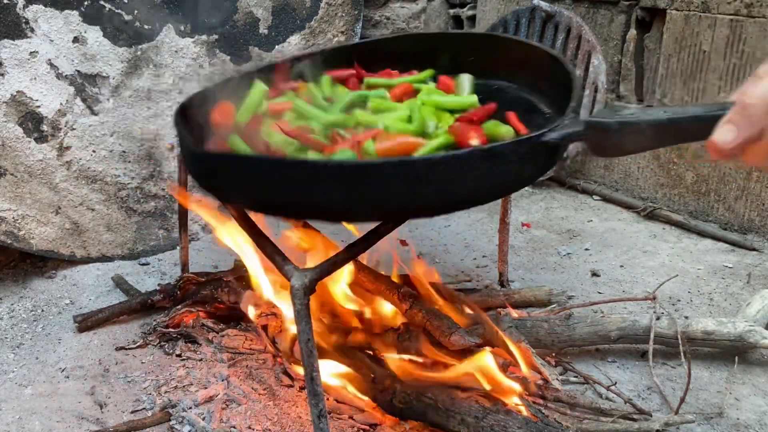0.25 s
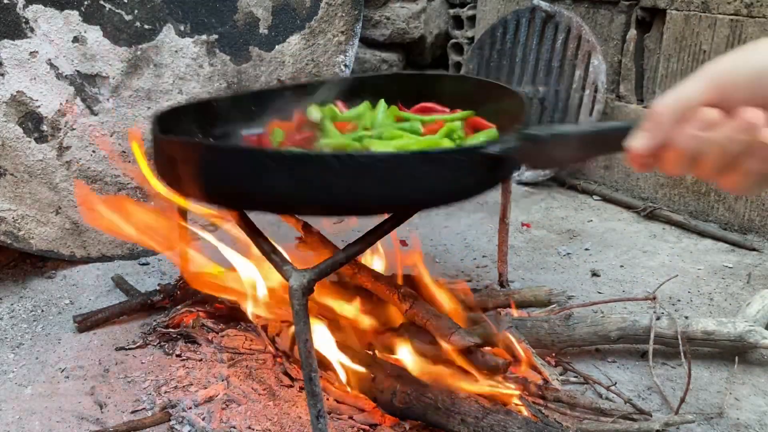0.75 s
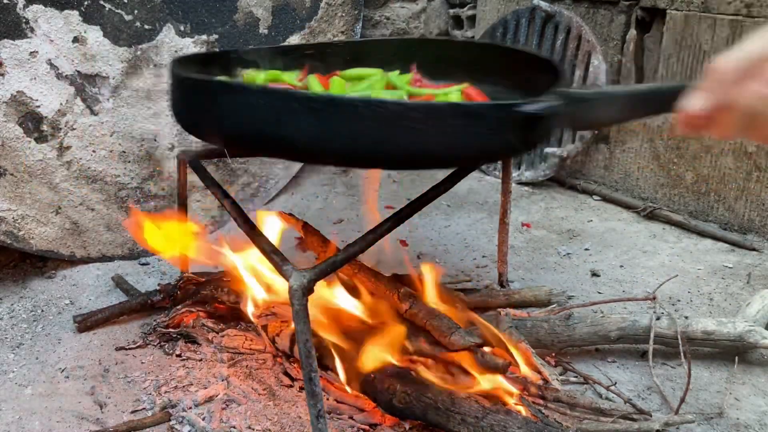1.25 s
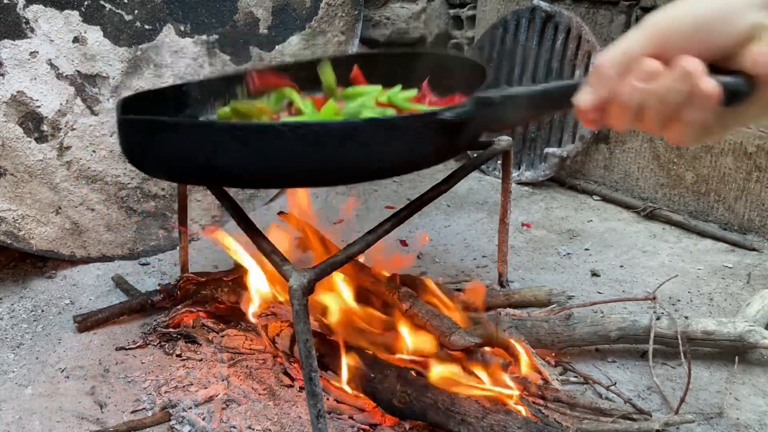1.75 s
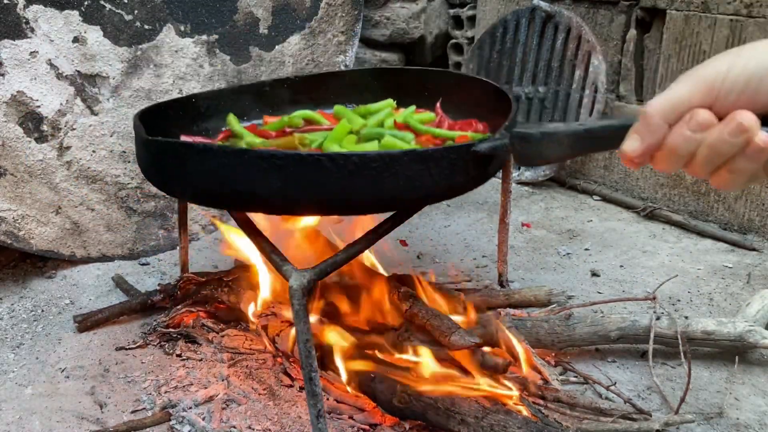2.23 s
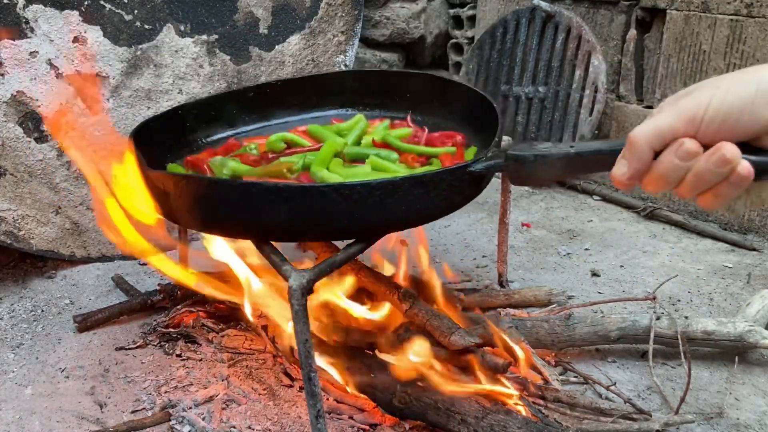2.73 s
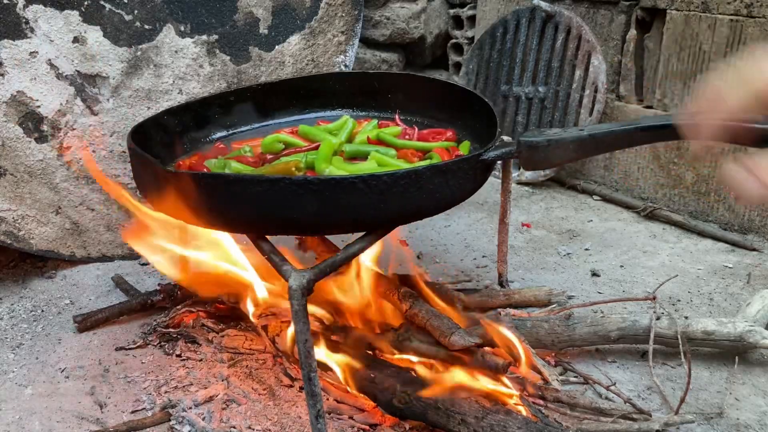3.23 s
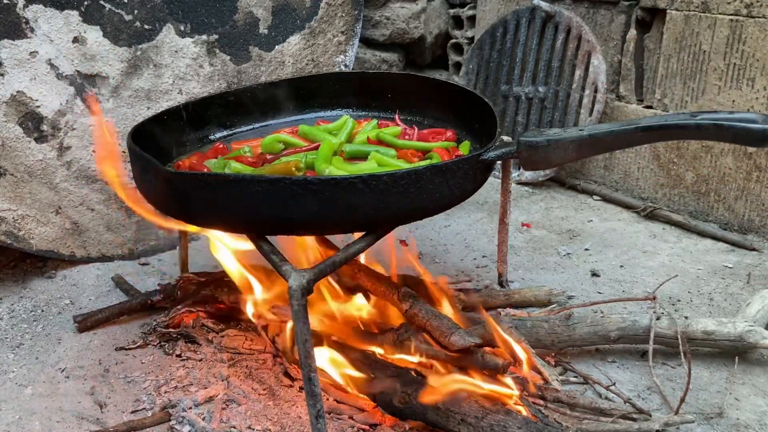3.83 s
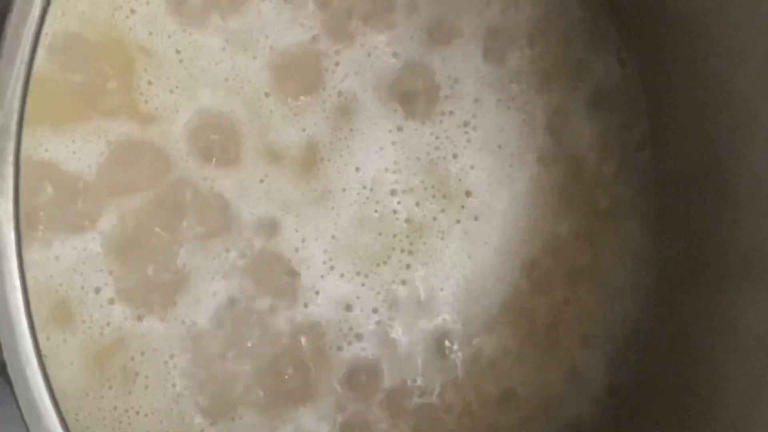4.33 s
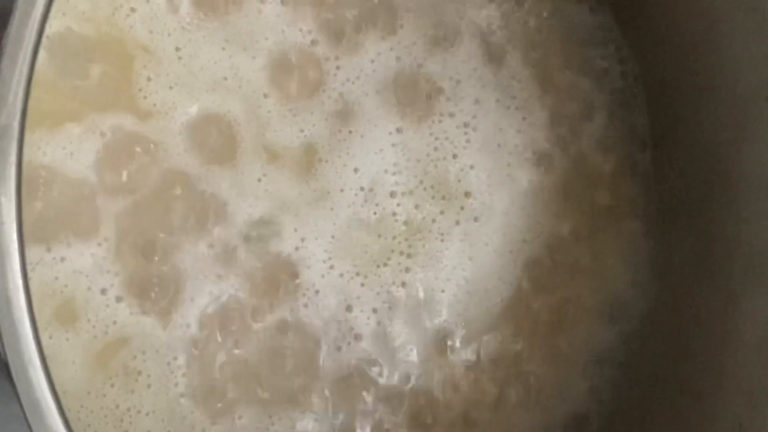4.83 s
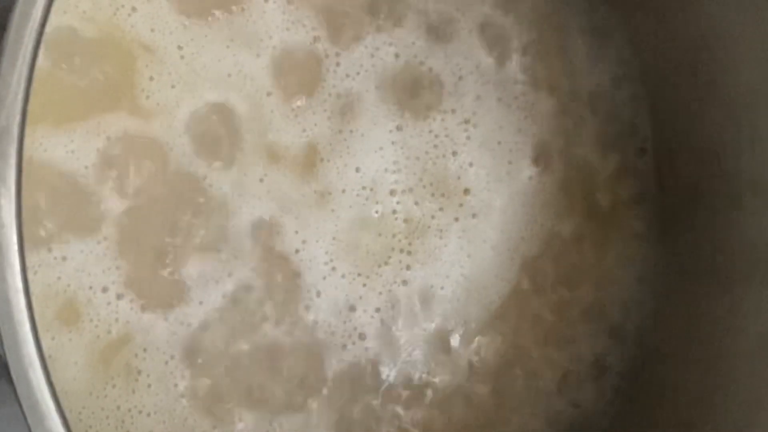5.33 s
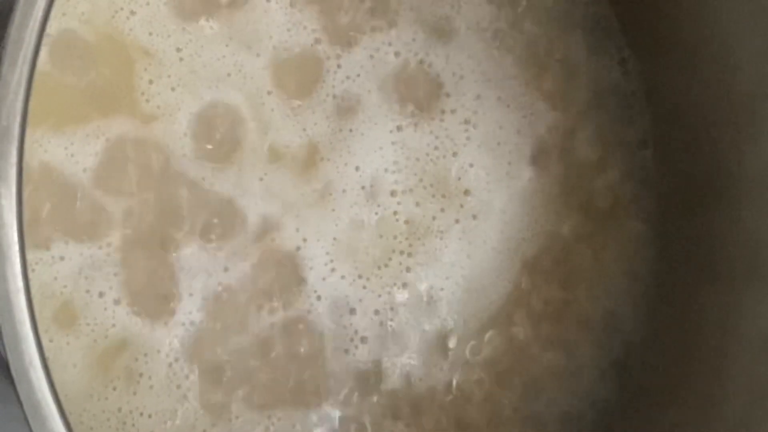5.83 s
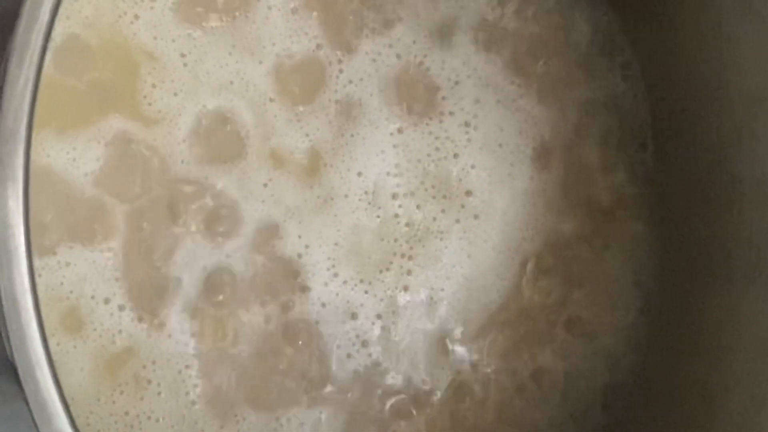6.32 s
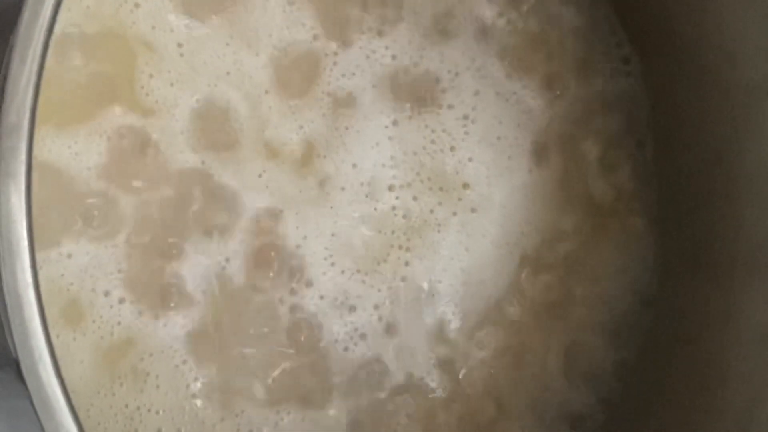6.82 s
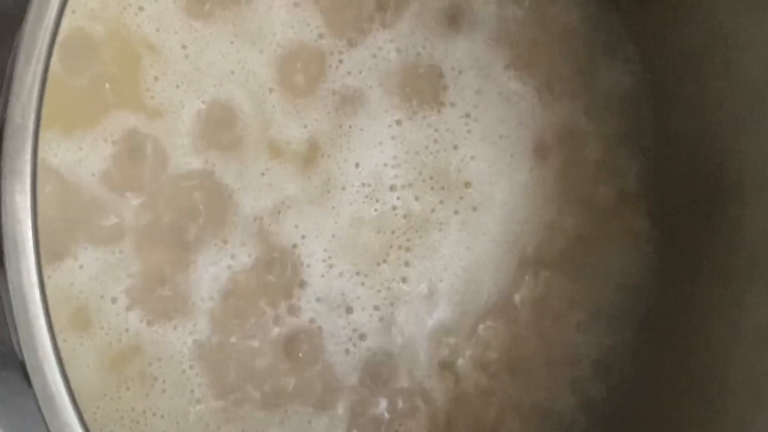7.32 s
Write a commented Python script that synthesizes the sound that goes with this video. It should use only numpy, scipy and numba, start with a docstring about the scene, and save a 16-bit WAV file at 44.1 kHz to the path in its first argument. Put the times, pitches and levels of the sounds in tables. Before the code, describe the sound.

From 0 to about 4.07 seconds, in a yard, peppers fry in hot oil: a loud, bright, continuous sizzle, slightly softer at the very start, swelling by 0.3 seconds and easing after 3. Countless tiny steam blips and sharp, irregular fat spits crackle through it. Underneath, a wood fire flutters low and soft. The steel pan knocks an iron trivet at about 0.65 seconds, short and dull with a low thud, then clunks and rattles from 2.6 to 3.0, with weaker taps around 3.6. A hard cut at 4.07 drops to a much quieter kitchen. Until about 7.6 seconds, thick foamy broth seethes close by: small rising blips, rounded wet pops and low plops in uneven clusters, stronger near 4.45 and 7.35, with faint droplet ticks, slight pot-wall resonance, low stove hum and faint hiss. Close phone stereo, wide in the yard and narrower over the pot.

```python
"""A yard, then indoors after a hard cut: a steel pan over a wood fire, and close over a pot of thick foamy broth.
Yard: peppers sizzle in hot oil (flickering noise), steam bubbles blip (short sines), fat spits (sines and noise
bursts), the pan knocks on an iron trivet (ringing modes, late thuds) and flames flutter low (noise).
Kitchen: broth bubbles seethe and pop (rising sines, noise bursts), droplets tick, stove and room murmur (noise).
A phone with two microphone ports hears both: alike in the bass, the right port later in the treble."""
import sys
import numpy as np
from scipy import signal
from scipy.fft import rfft, irfft, next_fast_len
from scipy.io import wavfile
from scipy.ndimage import uniform_filter1d
from numba import njit

SR = 44100
rng = np.random.default_rng(int(sys.argv[2]) if len(sys.argv) > 2 else 0)


def bounce(signal):
    """Save signal as a 16-bit WAV file at the path given by the first command-line argument."""
    frames = np.transpose(np.atleast_2d(signal))
    limited = np.clip(frames, -1, 1)
    pcm = np.round(limited * 32767).astype(np.int16)
    wavfile.write(sys.argv[1], SR, pcm)


N = 333837
T = np.arange(N) / SR
SIZE = next_fast_len(N + 4096)  # FFT length, with room for filter tails
HZ = np.maximum(np.fft.rfftfreq(SIZE, 1 / SR), 1.)
CUT_S, CUT_FADE_S = 4.068, 0.0078  # from yard to kitchen


def undb(db):
    """Decibels to gain."""
    return 10 ** (np.asarray(db) / 20)


def unit(x):
    """Scaled to rms 1."""
    return x / np.sqrt(np.mean(x ** 2))


def curve(table):
    """A (time_s, value) table at every sample."""
    return np.interp(T, *np.transpose(table))


def along(points):
    """(pitch_hz, value) points at every frequency bin, straight lines over log frequency."""
    points = np.array(points)
    return np.interp(np.log(HZ), np.log(points[:, 0]), points[:, 1])


def shaped(x, gain):
    """Filter by a gain for every frequency bin."""
    return irfft(rfft(x, SIZE) * gain, SIZE)[..., :N]


def walk(rate):
    """Random levels held 1 / rate s and smoothed twice; rms 1."""
    hold = int(SR / rate)
    steps = np.repeat(rng.standard_normal(N // hold + 1), hold)
    smooth = uniform_filter1d(uniform_filter1d(steps, hold), hold)
    return unit(smooth[:N])


def bands(excite, colour, flicker_db, rate):
    """Overlapping octave bands of a coloured sound, each flickering on its own; rms 1."""
    out = 0
    spectrum = rfft(excite, SIZE) * undb(along(colour))
    for centre_hz in 2. ** np.arange(5, 15):
        octaves_away = np.clip(np.log2(HZ / centre_hz), -1, 1)
        share = np.cos(np.pi / 2 * octaves_away) ** 2
        band = irfft(spectrum * share, SIZE)[:N]
        out = out + band * undb(flicker_db * walk(rate))
    return unit(out)


@njit
def grains(n, start, hz, cycles, size, glide, rise):
    """Short sines that swell, glide in pitch and die; start marks the crest, cycles sets the decay."""
    y = np.zeros(n)
    soft = rise ** 2 / 2  # rounds the crest
    for k in range(len(start)):
        tau = cycles[k] * SR / hz[k]  # decay in samples
        phase = 0.
        for i in range(int(-3 * rise * tau), int(6 * tau)):
            j = int(start[k]) + i
            phase += 2 * np.pi * hz[k] / SR * (1 + glide * i / tau)
            if 0 <= j < n:
                if i < 0:
                    envelope = np.exp(-(i / (rise * tau)) ** 2)
                else:
                    envelope = np.exp(soft - np.sqrt(soft ** 2 + (i / tau) ** 2))
                y[j] += size[k] * np.sin(phase) * envelope
    return y


def bursts(s, db, t60_s, low_hz, high_hz, order=4, rise_s=0.00018):
    """Noise between two soft band edges that swells up to each moment and dies away."""
    starts = np.zeros(N)
    np.add.at(starts, (s * SR).astype(int), undb(db))
    t = np.arange(-1024, 2048) / SR
    swell = np.exp(np.minimum(t, 0) / rise_s)
    decay = undb(-60 * np.maximum(t, 0) / t60_s)
    envelope = signal.oaconvolve(starts, np.where(t < 0, swell, decay))[1024:N + 1024]
    edges = 1 / np.sqrt((1 + (low_hz / HZ) ** 4) * (1 + (HZ / high_hz) ** order))
    return shaped(envelope * rng.standard_normal(N), edges / np.sqrt(np.mean(edges ** 2)))


def crackle(rate, scatter_db, t60_s):
    """Tiny noise bursts at random moments, rate per second, most small and a few large."""
    chance = rng.random((N, 2)).T
    struck = chance[0] < rate / SR
    sizes = struck * undb(-scatter_db * np.log(chance[1] + .002))
    fade = undb(-60 * np.arange(256) / SR / t60_s)
    return unit(signal.fftconvolve(sizes, fade)[:N] * rng.standard_normal(N))


def echoes(x, t60_s):
    """A dense short tail of reflections, its impulse response scaled to energy 1."""
    t = np.arange(2048) / SR
    tail = rng.standard_normal(len(t)) * undb(-60 * t / t60_s)
    return signal.fftconvolve(x, tail / np.sqrt(np.sum(tail ** 2)))[:N]


def scatter(x, gain=0.5):
    """Four short all-pass echoes scramble the phases and keep the colour."""
    delays = rng.integers(8, 45, (4, 1))  # samples
    late = np.exp(-2j * np.pi * HZ * delays / SR)
    return shaped(x, np.prod((late - gain) / (1 - gain * late), axis=0))


# Colour of stove and room noise: pitch_hz, level_db (per Hz)
KITCHEN_COLOUR = [(25, -36), (45, 0), (70, 2), (125, 1.5), (165, -8.5), (235, 0), (300, -13.5), (400, -4.5),
                  (520, -20), (700, -7), (1000, -13), (2000, -20), (3500, -27.5), (5500, -34),
                  (9000, -35.5), (14000, -38), (15700, -47)]


def kitchen():
    """Low hum of the stove and faint hiss of the room, both as flickering noise."""
    return bands(rng.standard_normal(N), KITCHEN_COLOUR, flicker_db=2.7, rate=16.) * undb(-60.5)


# Loudness of the fire: start_s, level_db
FLAME_LEVEL = [(0.0, -48), (3.87, -47.5), (4.06, -54.5)]
# Colour of the fire: pitch_hz, level_db (per Hz)
FLAME_TONE = [(25, -26), (40, 2.5), (60, -3.5), (110, -1.5), (200, -8.5), (350, -15), (600, -27.5)]


def flames():
    """The wood fire flutters low: noise in bands whose levels wander."""
    flutter = bands(rng.standard_normal(N), FLAME_TONE, flicker_db=2.5, rate=11.0)
    return flutter * undb(curve(FLAME_LEVEL))


# Pan against trivet: start_s, level_db, thud_pitch_hz (at the crest), ring_db (against the thud),
# tilt_db (per octave away from 400 Hz, on the ringing modes)
PAN_KNOCKS = [(0.652, -20, 114.5, -3.5, 0.5), (0.681, -30, 99, -1, 0), (0.696, -31.5, 119, -9, 0),
              (2.611, -19, 114, -2, 4), (2.668, -22, 134, -11, -15.5), (2.727, -27, 108, -20.5, -4),
              (2.77, -27, 117, 3, -8), (2.865, -28, 119.3, -6.5, -10), (2.887, -31.5, 125, -1.5, -13),
              (2.964, -34.5, 150, -3, 3), (2.98, -37, 120, -16, 0), (3.583, -34, 201, -5, -9),
              (3.597, -30, 136.6, -18, -3), (3.62, -31, 164.4, -15.5, -5), (3.639, -34, 169.4, -17.5, 0),
              (3.662, -38.5, 130, -14.5, 0)]
# Ringing modes of the steel pan: pitch_hz, level_db, t60_s
PAN_RINGS = [(215, -10, .05), (406, -3, .05), (540.4, 3, 0.0555), (699, -3.5, 0.039)]
THUD_T60_S, THUD_LATE_S = 0.083, .0135


def knocks():
    """The pan rings and rattles; trivet and ground answer with a later thud that sags in pitch and rumbles on."""
    s, db, thud_hz, ring_db, tilt_db = np.transpose(PAN_KNOCKS)
    fall = np.log(1000)  # decay constants in one t60
    thud_s = s + THUD_LATE_S
    out = grains(N, thud_s * SR, thud_hz, THUD_T60_S * thud_hz / fall, undb(db), -0.08, 0.55)
    rumble = bursts(thud_s, db - 16.5, t60_s=.3, low_hz=90., high_hz=280., rise_s=.004)
    rattle = bursts(s, db + ring_db - 12.5, t60_s=0.11, low_hz=170., high_hz=900.0)
    out += rumble + rattle
    for mode_hz, mode_db, t60_s in PAN_RINGS:
        chance = rng.standard_normal((len(s), 2)).T
        # every knock detunes and weights the modes a little differently
        ring_hz = mode_hz * (1 + 0.03 * chance[0])
        level_db = db + ring_db + mode_db + tilt_db * abs(np.log2(mode_hz / 400)) + 1.2 * chance[1]
        out += grains(N, (s + 0.0023) * SR, ring_hz, t60_s * ring_hz / fall, undb(level_db), 0., 0.205)
    return out


# Clearer droplets ticking in the treble: start_s, level_db
DROPLETS = [(4.3049, -59), (4.7679, -57), (5.0058, -61.5), (5.0427, -62), (5.5167, -63), (5.597, -63),
            (6.0639, -60), (6.3792, -62), (6.474, -63), (6.8068, -62.5), (6.9918, -63), (7.1659, -54),
            (7.2582, -61)]


def splashes(count=5):
    """Each droplet ticks in a puff of hiss; count faint ones fall at random."""
    chance = rng.random((count, 2)).T
    faint = [CUT_S + (T[-1] - CUT_S) * chance[0], -62.5 + 6. * (chance[1] - .5)]
    s, db = np.hstack([np.transpose(DROPLETS), faint])
    tick = bursts(s, db, t60_s=0.0047, low_hz=7000., high_hz=15000.)
    puff = bursts(s, db - 15.0, t60_s=.12, low_hz=6000., high_hz=15120.0)
    return tick + puff


# Small bubbles in flurries and lulls: start_s, level_db (before the random sway)
SEETHE_LEVEL = [(4.08, -61), (4.45, -63.5), (4.55, -72), (4.7, -54), (4.9, -64.5), (5.0, -61),
                (5.12, -61.5), (5.4, -59.5), (6.0, -65), (6.08, -58), (6.3, -62), (6.58, -64.5),
                (6.8, -59.5), (7.15, -60.5), (7.27, -62), (7.4, -62.5), (7.57, -64)]


def seethe(count=600):
    """Many small bubbles as short rising sines, scattered in time, pitch and size."""
    chance = rng.random((count, 4)).T
    s = CUT_S + (T[-1] - CUT_S) * chance[0]
    hz = 450 * 2 ** (1.87 * chance[1])
    cycles = 0.594 + 0.923 * chance[3]
    # a few large among many small, weaker away from 800 Hz
    size = undb(-2.6 * np.log(chance[2] + 0.035) - 2.8 * abs(np.log2(hz / 800)))
    small = grains(N, s * SR, hz, cycles, size, 0.042, 0.88)
    return small / np.std(small[T > CUT_S]) * undb(curve(SEETHE_LEVEL) + 3.5 * walk(22.0))


# Broth bubbles bursting: start_s, level_db, pitch_hz (at the crest),
# spray_db (reference level that each part of the spray is set from)
BUBBLE_POPS = [(4.1514, -36, 1750, -54), (4.2162, -45.5, 1287, -61), (4.302, -45, 1390, -67),
               (4.3215, -46, 980, -68), (4.3502, -36, 920, -61), (4.3686, -40, 920, -67),
               (4.3776, -49, 980, -65), (4.4013, -36.5, 1650, -58), (4.4499, -32.5, 1105, -53),
               (4.461, -44, 1310, -71), (4.6021, -48, 780, -75), (4.6375, -39.5, 1040, -66),
               (4.653, -38.5, 1460, -65), (4.6647, -48, 1040, -73), (4.6936, -43, 1850, -48),
               (4.7113, -44, 1390, -63), (4.7178, -41, 1169, -66), (4.728, -37.5, 1850, -60),
               (4.742, -47, 730, -68), (4.753, -44, 2620, -54), (4.8203, -43, 1470, -62),
               (4.8408, -42, 980, -48), (4.86, -45, 870, -71), (4.9553, -40.5, 1170, -59),
               (4.9635, -41, 1470, -59), (4.98, -37.5, 1530, -55), (5.0416, -37, 1230, -72),
               (5.077, -46, 870, -78), (5.0985, -53, 818, -80), (5.1641, -36, 1850, -44),
               (5.1733, -47, 1850, -57), (5.2584, -40, 1560, -59), (5.2658, -41.5, 866, -74),
               (5.2928, -45, 981, -72), (5.303, -39, 3340, -37.5), (5.3082, -46, 2200, -57),
               (5.3195, -47, 780, -59), (5.3294, -45, 920, -66), (5.348, -40, 1560, -58),
               (5.3802, -37.5, 990, -56), (5.3893, -36, 1550, -57), (5.4622, -45, 1040, -73),
               (5.4694, -48, 980, -67), (5.4961, -38.5, 1560, -53), (5.519, -49, 1390, -65),
               (5.531, -34.5, 1373, -62), (5.5415, -36, 1730, -59), (5.5612, -50, 1850, -71),
               (5.5953, -43, 1470, -69), (5.6046, -39, 1960, -54), (5.6178, -50, 3110, -47),
               (5.6629, -43, 1470, -69), (5.6867, -45, 1171, -69), (5.6941, -48, 1470, -57),
               (5.7123, -45, 730, -64), (5.7203, -47, 870, -73), (5.7896, -39, 980, -66),
               (5.8527, -43, 1040, -65), (5.8602, -36.5, 1216, -60), (5.8695, -46, 1036, -68),
               (5.9006, -49, 1470, -62), (5.9159, -44, 1229, -64), (5.9487, -34.5, 1960, -48),
               (5.963, -41, 1390, -65), (5.9805, -44, 780, -69), (6.0109, -52, 2940, -56),
               (6.0154, -42, 1300, -62), (6.055, -50, 980, -73), (6.1378, -50, 1560, -71),
               (6.167, -45, 820, -62), (6.171, -40, 2200, -59), (6.1877, -46, 1390, -69),
               (6.1963, -46, 820, -73), (6.2284, -46, 870, -75), (6.2416, -36.5, 780, -68),
               (6.2573, -36.5, 1530, -58), (6.3214, -41, 1850, -63), (6.33, -40, 1040, -69),
               (6.3434, -44, 1470, -72), (6.3584, -46, 1310, -67), (6.3962, -41.5, 1100, -63),
               (6.4046, -41, 1540, -52), (6.4427, -54, 920, -74), (6.4798, -44, 870, -76),
               (6.4927, -40, 1170, -61), (6.4962, -41, 1470, -53), (6.5023, -43, 1390, -61),
               (6.5165, -49, 1100, -62), (6.6669, -44, 920, -75), (6.6766, -34, 1370, -57),
               (6.74, -44, 980, -72), (6.747, -46, 980, -71), (6.7569, -43, 1230, -66),
               (6.776, -43, 870, -65), (6.8255, -50, 980, -79), (6.85, -47, 920, -80),
               (6.867, -41.5, 1310, -63), (6.8747, -41, 1310, -64), (6.8906, -40.5, 1470, -65),
               (6.9201, -45, 1660, -60), (6.9388, -45, 820, -76), (6.95, -47, 1560, -69),
               (6.9614, -37.5, 1440, -63), (6.9887, -43, 1390, -69), (7.0071, -40, 1472, -58),
               (7.0363, -47.5, 730, -76), (7.077, -41, 1160, -70), (7.1196, -43.5, 820, -71),
               (7.173, -37, 1043, -62), (7.19, -51, 1560, -61), (7.2039, -50, 1850, -67),
               (7.3492, -33, 1020, -55.5), (7.3636, -51, 2200, -58), (7.3739, -35.5, 1650, -49),
               (7.3805, -44.5, 1850, -53), (7.3885, -43, 2080, -56), (7.3937, -45, 1750, -57),
               (7.4322, -45, 1560, -68), (7.4469, -49, 780, -73), (7.4613, -36, 820, -61),
               (7.506, -44.5, 1170, -73), (7.5626, -44, 1100, -64)]
BLIP_CYCLES, PLOP_DB = 0.81, -17.5  # mean decay; mean plop level against the blip


def pops():
    """A burst is a short rising blip, a second blip, a low plop, a snap in ragged spray and settling foam."""
    s, db, hz, spray_db = np.transpose(BUBBLE_POPS)
    chance = rng.random((len(s), 6)).T
    one = np.ones(len(s))
    cycles = BLIP_CYCLES * (0.8 + 0.4 * chance[3])
    blip = grains(N, s * SR, hz, cycles, undb(db), 0.026, 1.084)
    # a neighbouring bubble follows within 5 ms
    near_s, near_hz = s + 0.00494 * chance[0], hz * (0.54 + 0.62 * chance[1])
    near = grains(N, near_s * SR, near_hz, 0.9 * cycles, undb(db - 5.5), 0.045, 1.085)
    # the broth slumps into the cavity
    plop_hz, plop_db = 270 + 230 * chance[2], db + PLOP_DB + 13.0 * (chance[4] - .5)
    plop = grains(N, (s + 0.0016) * SR, plop_hz, 0.71 * one, undb(plop_db), 0.058, 0.91)
    snap_hz = 2300 * 2 ** (0.76 * chance[5])
    snap = grains(N, s * SR, snap_hz, 0.92 * one, undb(spray_db), .03, 0.46)
    spray = bursts(s, spray_db - 5.0, t60_s=0.008, low_hz=1600., high_hz=3300.0, order=5, rise_s=0.00082)
    settle = bursts(s, db - 20.0, t60_s=0.073, low_hz=601.0, high_hz=1616.0, order=5, rise_s=0.0047)
    settle += bursts(s, spray_db - 22.0, t60_s=0.19, low_hz=1620.0, high_hz=2830.0, rise_s=.006)
    # the wet foam swallows the top
    foam = 1 / np.sqrt(1 + (HZ / 5100) ** 16)
    return blip + near + plop + snap + shaped(spray + settle, foam)


# Loudness of the frying: start_s, level_db (before the low part is lowered)
SIZZLE_LEVEL = [(0.0, -29.5), (0.34, -24.5), (0.55, -25.5), (0.65, -23), (0.75, -24), (1.2, -24.5),
                (1.8, -23.5), (1.9, -25.5), (2.1, -24.5), (2.45, -25.5), (2.69, -22.5), (3.0, -24.5),
                (3.45, -26), (4.06, -28)]
# Colour of the sizzle at one port: pitch_hz, level_db (per Hz, before the low part is lowered)
SIZZLE_TONE = [(250, -15), (350, -15), (550, -6), (800, -4.5), (1300, -1.5), (2200, 0), (3500, -2),
               (5500, -4.5), (7000, -4), (8800, 1.5), (11000, -0.5), (14000, -4.5), (15800, -5)]
WET_DB, WET_SWAY_DB = -2, 1.06  # mean gain of the lower part, and its sway


def sizzle():
    """Steam bubbles burst in the oil by the thousand, over a hiss that comes in quick puffs."""
    spray = crackle(rate=1100., scatter_db=2.0, t60_s=0.003) * undb(-3.0) + rng.standard_normal(N)
    puffs = spray * undb(0.83 * walk(70.))
    full = bands(puffs, SIZZLE_TONE, flicker_db=1.5, rate=35.)
    low = shaped(full, 1 / (1 + (HZ / 4200) ** 4))
    # the lower part sits about 2 dB down and sways slowly
    low_gain = undb(WET_DB + WET_SWAY_DB * walk(4.))
    return (full + (low_gain - 1) * low) * undb(curve(SIZZLE_LEVEL))


def blisters(count=2400):
    """Larger steam bubbles pop out of the oil with a rising blip of a few cycles."""
    chance = rng.random((count, 4)).T
    s, hz = chance[0] * CUT_S, 1050 * 2 ** (2.3 * chance[1])
    cycles = .5 + 1.6 * chance[3]
    size = undb(-3.2 * np.log(chance[2] + 0.019))
    blips = grains(N, s * SR, hz, cycles, size, 0.039, 0.3975)
    return blips / np.std(blips[T < CUT_S]) * undb(curve(SIZZLE_LEVEL) - 13)


# Loud spits of fat: start_s, crack_db, body_db (reference levels that each part is set from;
# the body is the part below 5 kHz)
FAT_SPITS = [(0.01, -8, -24), (0.047, -19, -32), (0.168, -11.5, -26), (0.1732, -16, -27.5),
             (0.2547, -18.5, -22), (0.2617, -14, -24.5), (0.2827, -7.5, -26), (0.2956, -6.5, -36.5),
             (0.4166, -3, -15), (0.4604, -6.5, -25.5), (0.4677, -10.5, -29.5), (0.4812, -5.5, -32),
             (0.618, -8, -26.5), (0.642, -12.5, -30), (0.6556, -8, -23), (0.741, -23, -19.5),
             (0.7931, -14.5, -22), (0.81, -18, -18.5), (0.9002, -11.5, -28.5), (0.946, -8, -26),
             (1.0026, -5, -22.5), (1.264, -18.5, -18.5), (1.419, -5.5, -23), (1.442, -5, -22),
             (1.5672, -9.5, -16), (1.661, -12, -18), (1.6755, -9.5, -25), (1.7485, -12.5, -21),
             (1.773, -15, -18.5), (2.0427, -12.5, -32), (2.1419, -16.5, -14.5), (2.1583, -8, -17),
             (2.22, -15.5, -21), (2.234, -9, -14), (2.344, -19, -19.5), (2.3759, -6, -22.5),
             (2.4109, -19, -13), (2.4161, -23.5, -26), (2.527, -20, -23.5), (2.553, -8, -26),
             (2.745, -7, -23.5), (2.7651, -9, -24), (2.9417, -14.5, -19), (2.9966, -13, -25),
             (3.0485, -3.5, -17), (3.1432, -12.5, -22), (3.157, -12.5, -12.5), (3.1689, -16, -19),
             (3.207, -22.5, -33), (3.226, -6.5, -29.5), (3.247, -8.5, -17.5), (3.344, -10.5, -26.5),
             (3.3767, -14.5, -15.5), (3.4557, -7.5, -13.5), (3.46, -21.5, -11), (3.486, -21, -40),
             (3.5653, -26, -13.5), (3.5888, -23, -18), (3.5956, -9.5, -19), (3.6394, -16, -26),
             (3.647, -6, -22), (3.7314, -15, -23), (3.7376, -24, -21.5), (3.8119, -21.5, -37),
             (3.8769, -29, -20), (3.9811, -22, -13.5)]
SMALL_SPIT_DB, SMALL_BODY_DB = -17.5, -27  # mean reference levels of the random spits


def spits(count=30):
    """Each spit is a sharp ringing crack, a lower click and a wisp of steam; count small ones come at random."""
    chance = rng.random((count, 3)).T
    small_db = SMALL_SPIT_DB + 6. * (chance[1] - .5)
    small_body_db = SMALL_BODY_DB + 8. * (chance[2] - .5)
    small = [CUT_S * chance[0], small_db, small_body_db]
    s, db, body_db = np.hstack([np.transpose(FAT_SPITS), small])
    one = np.ones(len(s))
    pitch = rng.random((len(s), 2)).T
    snap = grains(N, s * SR, 7500 + 1500 * pitch[0], 2.2 * one, undb(db - 4.5), 0., .35)
    crack = bursts(s, db - 10.5, t60_s=0.006, low_hz=5570.0, high_hz=14200.0)
    click = grains(N, s * SR, 1900 * 2 ** (.8 * pitch[1]), .6 * one, undb(body_db + 0.5), 0., .6)
    body = bursts(s, body_db - 8.5, t60_s=0.014, low_hz=1218.0, high_hz=4200., rise_s=.0005)
    steam = bursts(s, db - 27.0, t60_s=0.12, low_hz=4847.0, high_hz=13700.0)
    return snap + crack + click + body + steam


def ports(common, other, low, lead_s, treble, treble_hz, lag_s, step_hz, right_db):
    """The right port gets the bass a little early, the treble late; a second sound fills what is not shared."""
    up = 1 / (1 + (treble_hz / HZ) ** 10)  # 0 in the bass, 1 in the treble
    early = np.exp(2j * np.pi * HZ * lead_s)
    late = np.exp(-2j * np.pi * (HZ - step_hz) * lag_s)
    bass_like = np.clip(along(low), 0, 1)
    like = (1 - up) * bass_like * early + up * min(treble, .97) * late
    rest = np.sqrt(np.clip(1 - abs(like) ** 2, 0, 1))
    tilt = undb(along(right_db) / 2)
    left = shaped(common, 1 / tilt)
    right = shaped(common, like * tilt) + shaped(other, rest * tilt)
    return np.array([left, right])


# The two microphone ports in each place: bass likeness as (pitch_hz, likeness held to 0-1), bass_lead_s,
# treble likeness (held to .97), treble_from_hz, treble_lag_s, in_step_hz, right minus left as (pitch_hz, level_db)
YARD_MICS = ([(60, 1.4), (150, .95), (500, 0.73), (1500, 0.64), (3000, 0.52)],
             .00005, 1, 5250, 0.00028, 7926, [(600, 1), (1500, 3), (5000, 0)])
POT_MICS = ([(100, 0.89), (450, 0.56), (1100, 1), (2000, 0.99)],
            0.00012, 1, 3440, 0.00016, 8670, [(400, 0.5), (1800, 3.5), (6000, 0)])


def scene():
    """The yard until the cut, then close over the pot."""
    hits = spits() + blisters() + knocks()
    # each port hears its own draw of the sizzle and fire
    yard = ports(sizzle() + flames() + hits, sizzle() + flames() + scatter(hits), *YARD_MICS)
    broth = pops() + seethe() + splashes()
    broth = broth + undb(-21.0) * echoes(broth, t60_s=0.21)  # the pot walls
    pot = ports(broth + kitchen(), scatter(broth) + kitchen(), *POT_MICS)
    before = 1 / (1 + np.exp(np.clip((T - CUT_S) / (CUT_FADE_S / 4), -50, 50)))
    return yard * before + pot * (1 - before)


def record(dry):
    """The phone cuts the deepest bass gently and the top steeply."""
    bottom = signal.butter(4, 35.9, "high", fs=SR, output="sos")  # Hz
    top = signal.ellip(12, .3, 70, 15700, fs=SR, output="sos")  # ripple dB, stop dB, Hz
    return signal.sosfilt(top, signal.sosfilt(bottom, dry))


dry = scene()
out = record(dry)
bounce(out)
```